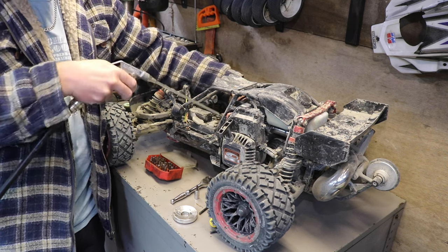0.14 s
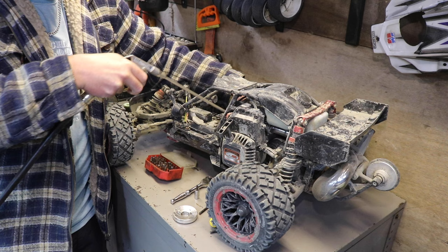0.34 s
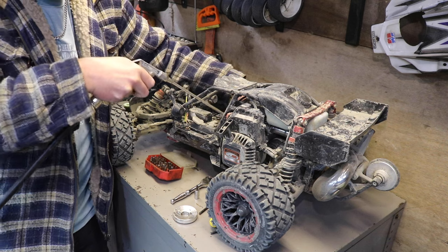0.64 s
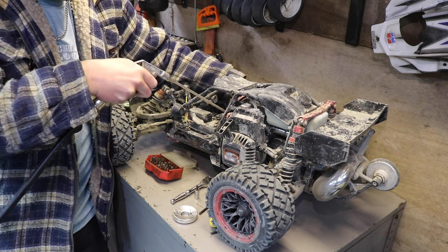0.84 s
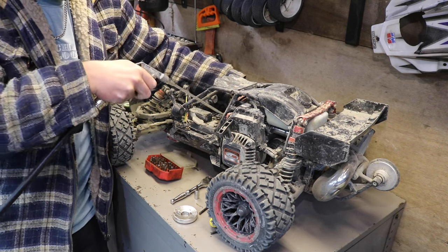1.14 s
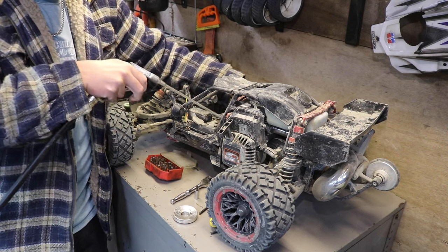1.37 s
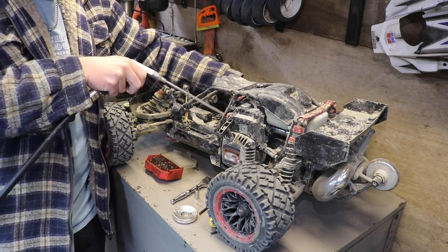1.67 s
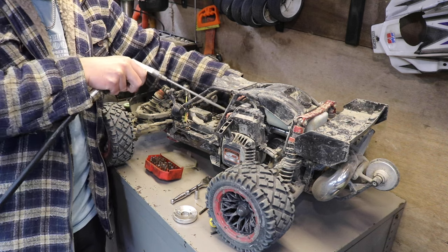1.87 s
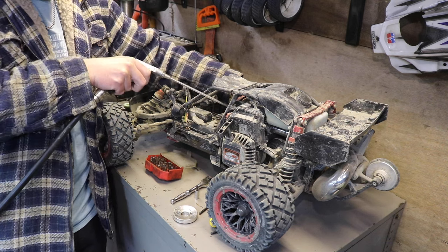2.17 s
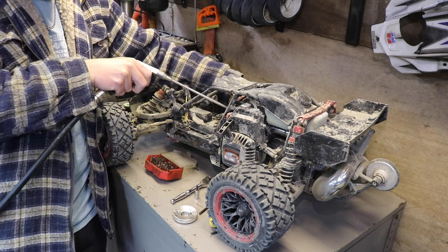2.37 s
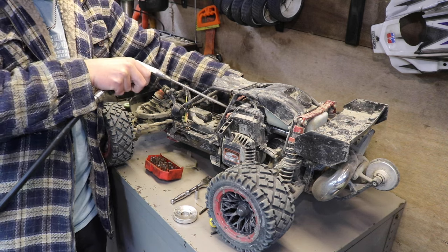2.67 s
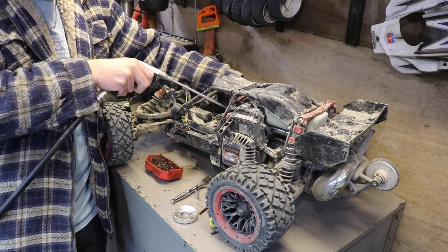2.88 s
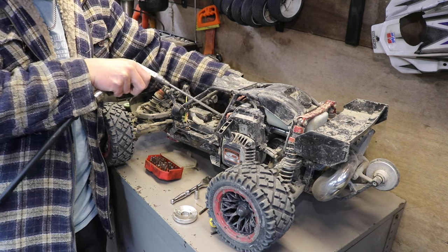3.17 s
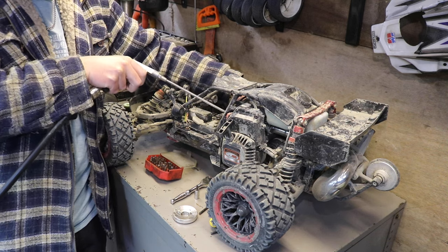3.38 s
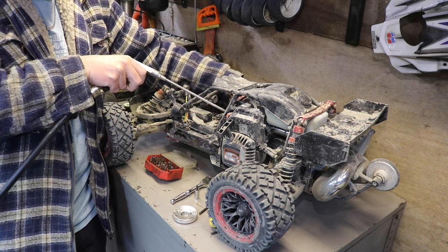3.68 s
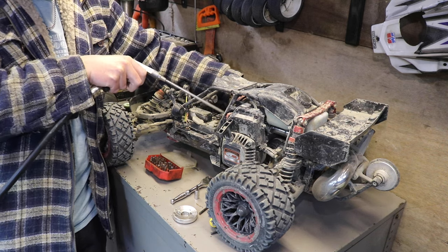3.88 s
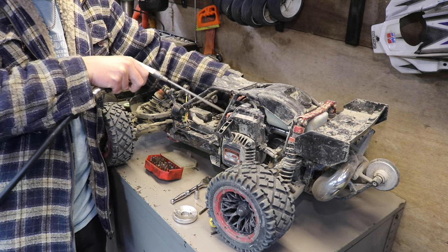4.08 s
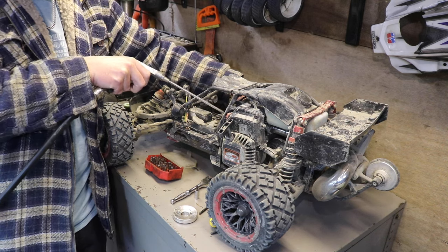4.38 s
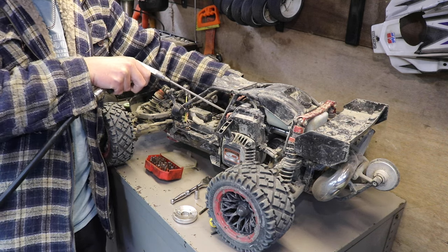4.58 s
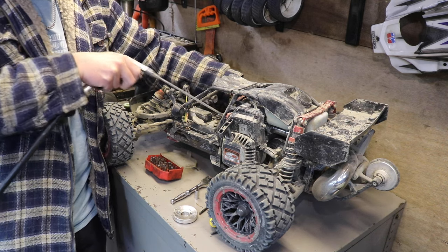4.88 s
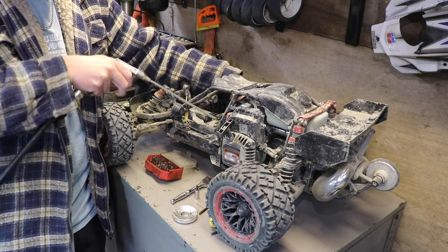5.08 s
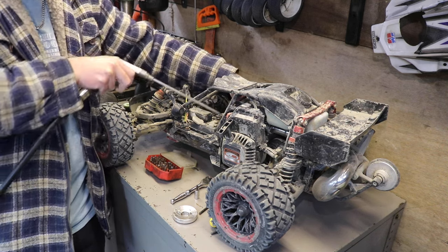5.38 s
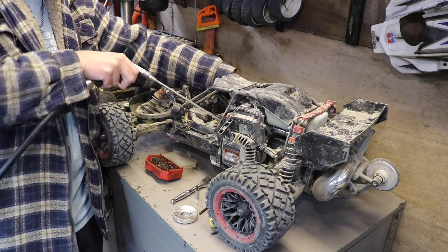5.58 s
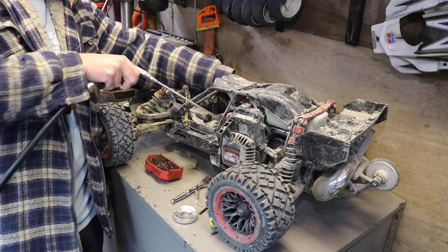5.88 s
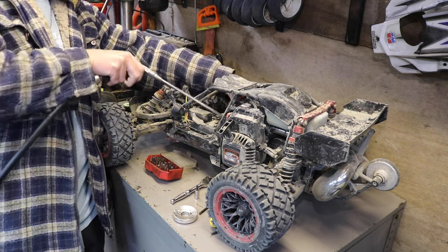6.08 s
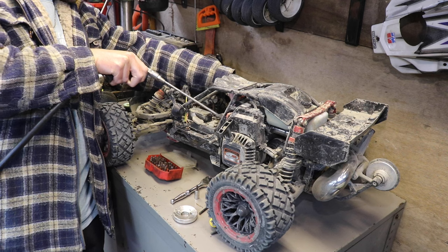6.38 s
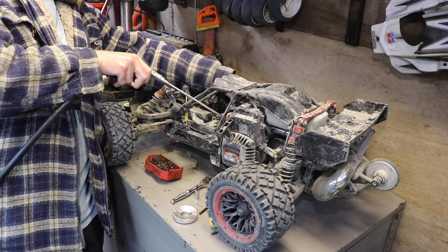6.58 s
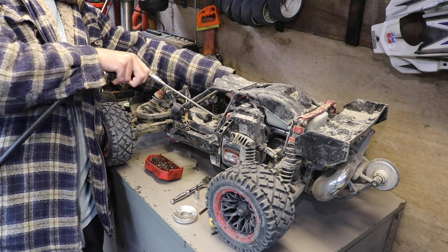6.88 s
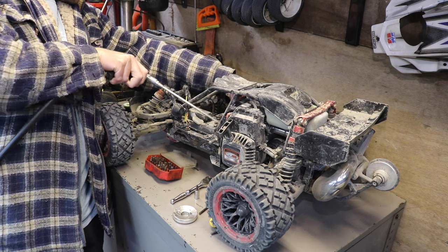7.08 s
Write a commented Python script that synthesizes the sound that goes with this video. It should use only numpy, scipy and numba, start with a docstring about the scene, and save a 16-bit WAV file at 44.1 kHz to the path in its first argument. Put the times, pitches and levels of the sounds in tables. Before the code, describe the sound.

Close in a small workshop, an air gun blows dust off a model engine. The tail of one blast stops at once, then come a short blast, a long one and another of about two seconds. The bright hiss roars when it strikes parts squarely, thins as it passes them, and chirps or shrieks on hollows and edges. Two faint ticks on the bench come near the end.

```python
"""Air gun on a model engine

A compressed-air gun blows dust off a model car's engine on a workshop bench, in four blasts.
The jet is shaped noise: it hisses, roars where it strikes the parts and takes on passing colours.
Gliding sines sing in hollows, on cooling fins and on sharp edges; damped modes tick twice on the bench.
Decaying noise tails give the scatter of the parts and the walls' brief answer, over a quiet room with thin tones.
"""
import sys
import numpy as np
from scipy import signal
from scipy.fft import rfft, irfft, next_fast_len
from scipy.io import wavfile
from scipy.ndimage import uniform_filter1d, map_coordinates
from numba import njit

SR = 44100
rng = np.random.default_rng(int(sys.argv[2]) if len(sys.argv) > 2 else 0)


def generate_wav(signal):
    """Clip the signal to [-1, 1] and save it as 16-bit WAV at the path in sys.argv[1]."""
    frames = np.transpose(np.atleast_2d(signal))
    scaled = np.clip(frames, -1, 1) * 32767
    pcm = np.round(scaled).astype(np.int16)
    wavfile.write(sys.argv[1], SR, pcm)


N = 319284  # length in samples


def amp(db):
    """Decibels to linear gain."""
    return 10 ** (np.asarray(db) / 20)


def unit(x):
    """Scale to an rms of one."""
    return x / np.sqrt(np.mean(np.abs(x) ** 2) + 1e-20)


def along(points, hz):
    """Read a curve of (Hz, value) points on a log frequency axis."""
    point_hz, value = np.transpose(points)
    return np.interp(np.log(hz + 1), np.log(point_hz + 1), value)


def sides(pan_db):
    """Left and right gains for a level difference; positive leans left."""
    return amp(np.array([pan_db, -pan_db]) / 2)


def wander(t, rate):
    """A smooth random curve at the times t, with rate knots a second."""
    knots = rng.standard_normal(int(t[-1] * rate) + 4)
    return map_coordinates(knots, [t * rate])


def wobble(rate, size):
    """A smooth random curve with one value for each of size samples."""
    return wander(np.arange(size) / SR, rate)


def within(t, start, end, ramp_s):
    """A gate from 0 to 1 and back, with linear ramps centred on both ends."""
    return np.clip(np.minimum(t - start, end - t) / ramp_s + 0.5, 0, 1)


def resonance(hz, centre_hz, width_hz):
    """A bell of height one around a resonance."""
    return 1 / (1 + (2 * (hz - centre_hz) / width_hz) ** 2)


def paired(a, b, alike):
    """Left and right spectra from two unrelated ones, as alike as asked."""
    turn = np.arccos(np.clip(alike, -1, 1))[:, None] / 2
    shared, apart = np.cos(turn) * a, np.sin(turn) * b
    return np.array([shared + apart, shared - apart])


def noise(gain):
    """Stereo noise whose rms density follows gain(Hz, s)."""
    # left-right likeness of the noise: pitch_hz, likeness (1 = identical)
    likeness = [(50, .75), (200, 0.94), (1500, 1), (6000, 0.9), (14000, 0.61)]
    hz, t, (a, b) = signal.stft(rng.standard_normal((2, N)), SR, nperseg=512)
    spectra = paired(a, b, along(likeness, hz)) * gain(hz, t)
    return signal.istft(spectra, SR, nperseg=512)[1][:, :N]


def valve(t):
    """Flow against the open valve in dB: the trigger opens it, then the flow dies to a seep."""
    # trigger pulls: opening_s, fully_open_s, let_go_s, dying_db_per_s, seep_db
    blasts = [(-.1, -.05, 0.11, 480, -67), (0.34, 0.441, 1.276, 480, -30), (1.446, 1.509, 5.14, 600, -69),
              (5.308, 5.382, 7.313, 501, -64)]
    opening_bend = 0.57  # exponent under 1: the valve opens fast at first
    flow_db, before_db = np.full(len(t), -99.), blasts[0][-1]
    for start, full, end, dying, seep_db in blasts:
        opened = np.clip((t - start) / (full - start), 0, 1) ** opening_bend
        rise_db = before_db * (1 - opened)
        fall_db = np.maximum(-dying * np.maximum(t - end, 0), seep_db)
        flow_db = np.where(t >= start, rise_db + fall_db, flow_db)
        before_db = seep_db
    return flow_db


def layer_levels(t):
    """Roar, rush, hiss and fizz in dB: one curve sets the hiss, and strikes bring out the lower layers."""
    # course of the hiss, with dips after the shrieks: time_s, nominal hiss_level_db
    hiss_course = [(0.0, -24), (0.02, -16.5), (0.11, -23), (0.44, -16), (0.48, -21), (0.732, -24),
                   (0.746, -27), (0.948, -27), (0.99, -20.5), (1.08, -21.5), (1.124, -24.5), (1.148, -16),
                   (1.184, -28), (1.27, -27.5), (1.51, -23), (1.58, -17.5), (1.69, -23.5), (1.73, -32.5),
                   (1.81, -29), (1.91, -24), (1.93, -33), (1.96, -36), (2.04, -29), (2.13, -25.5),
                   (2.22, -41), (2.31, -26.5), (2.36, -42), (2.44, -32), (2.82, -27.5), (2.84, -27),
                   (2.87, -32), (2.91, -36.5), (3.02, -26.5), (3.12, -26.5), (3.15, -31.5), (3.19, -25.5),
                   (3.28, -28), (3.49, -25.5), (3.56, -41), (3.59, -28.5), (3.62, -47), (3.8, -21),
                   (4.06, -30.5), (4.17, -22), (4.27, -26), (4.29, -20), (4.31, -26), (4.55, -26),
                   (4.62, -30), (4.64, -23.5), (4.8, -27), (4.83, -27), (4.92, -24.5), (4.95, -33.5),
                   (5.02, -23), (5.14, -21.5), (5.4, -19.5), (5.522, -22), (5.542, -25.5), (5.774, -23),
                   (5.85, -27), (6.014, -26), (6.086, -29.5), (6.204, -24), (6.336, -27.5), (6.378, -25),
                   (6.542, -26), (6.568, -23), (6.644, -21.5), (6.752, -29), (6.758, -26), (6.988, -24),
                   (7.008, -18), (7.168, -29), (7.24, -27)]
    # square landings darken the jet, passing the parts thins it: start_s, end_s, roar_gain_db, rush_gain_db
    strikes = [(0, .03, -3.5, -3), (0.4, 0.73, 1.5, 2), (0.964, 1.096, 5, 2.5), (1.173, 1.522, 11, 6.5),
               (2.07, 2.156, 3, 4), (2.764, 2.87, 4.5, 5.5), (2.977, 3.048, 6.5, 4.5),
               (3.148, 3.324, 8.5, 8), (3.975, 4.11, 10, 8), (4.201, 4.29, 7, 4.5),
               (4.422, 4.53, 7.5, -0.5), (4.64, 4.707, 5.5, 0.5), (4.831, 4.91, 6.5, 6.5),
               (5.326, 5.434, 9, 1), (5.848, 6.228, 8.5, 3), (4.956, 5.3, -3, -2), (5.683, 5.842, -4, -2),
               (6.232, 6.7, -2.5, -1), (4.304, 4.416, 3, -5), (4.73, 4.83, -2, -3), (4.12, 4.19, -2, -3),
               (.76, .95, 2, 0), (3.06, 3.135, -0.5, -5.5), (6.734, 6.91, 4.5, 1.5), (6.935, 7.07, 3, 2.5),
               (7.12, 7.2, 3.5, 0)]
    # a glancing jet against the hiss, one level_db each for roar, rush, hiss, fizz
    glancing_db = [-17, -8.5, 0, -2]
    # share of the hiss's swings that each layer ignores (0 to 1), in the same order
    steady = [0.51, 0.45, 0.074, .3]
    # how fully each layer follows the valve (dB per dB), in the same order
    valve_grip = [.8, .85, 1, 1.02]
    landing_s, fizz_per_roar = 0.012, -0.18  # a strike sets in quickly and dulls the top (dB per dB)
    time_s, hiss_db = np.transpose(hiss_course)
    hiss = np.interp(t, time_s, hiss_db)
    roar, rush = sum(np.outer(gains_db, within(t, start, end, landing_s))
                     for start, end, *gains_db in strikes)
    glancing = np.array(glancing_db)[:, None] + hiss - np.outer(steady, hiss - hiss_db.mean())
    struck = [roar, rush, 0 * t, fizz_per_roar * roar]
    return glancing + struck + np.outer(valve_grip, valve(t))


def jet_colour(hz, t):
    """The jet's spectrum, bent by how hard it strikes and by passing stretches of colour."""
    # shape of the plain jet: pitch_hz, relative density level_db
    plain_jet = [(24, -80), (40, -28.5), (171, -40), (303, -21), (476, -16.5), (959, -8), (1060, -8.5),
                 (2740, -5.5), (3520, -4.5), (4410, -7), (5260, -7.5), (6580, -8.5), (8670, -5),
                 (12900, -3), (15800, -5)]
    # ranges of roar, rush, hiss, fizz: low_hz, high_hz
    layers = [(250, 1500), (2400, 5000), (5000, 10000), (10000, 14000)]
    # coloured stretches of the jet, some swelling into a shriek:
    # start_s, end_s, mean centre_hz, width_hz, mean peak_db
    colours = [(0.403, 0.756, 3750, 170, 5.5), (0.416, 1.1, 5170, 400, 4), (4.125, 4.185, 2150, 450, 10),
               (3.47, 3.66, 13500, 2500, 4), (.42, 0.74, 9470, 200, 10), (0.43, 0.52, 2010, 400, 11.5),
               (1.556, 1.69, 2130, 597, 13), (2.4, 2.843, 6970, 400, 5), (3.006, 3.144, 8350, 600, 7),
               (3.165, 3.307, 3900, 1400, 4.5), (3.763, 3.97, 2210, 352, 15.5),
               (3.774, 3.975, 6300, 497, 6), (4.127, 4.5, 8200, 500, 6.5), (4.593, 4.825, 2190, 550, 10.5),
               (4.637, 4.82, 6620, 600, 11), (4.706, 4.818, 10400, 500, 10), (5.363, 6.22, 8530, 900, 5),
               (5.902, 6.25, 10500, 300, 7), (6.107, 7.247, 3550, 420, 9), (6.803, 6.87, 3620, 600, 3.5),
               (5.63, 5.68, 3600, 500, 6), (5.356, 6.107, 3650, 500, 4.5), (4.98, 5.156, 3720, 300, 8.5),
               (4.525, 4.595, 2280, 600, 11), (6.35, 6.7, 10500, 250, 3), (2.285, 2.34, 15000, 1500, 8),
               (3.575, 3.605, 15200, 1500, 8), (3.69, 3.725, 1700, 300, 8), (3.465, 3.49, 2200, 600, 6),
               (7.0, 7.13, 13500, 3000, 3), (4.05, 4.13, 14500, 2500, 4), (.8, .97, 15200, 2000, 6),
               (1.498, 1.707, 13100, 3500, 2), (3.303, 3.38, 14100, 3000, 4), (5.45, 5.53, 5400, 298, 8),
               (6.15, 6.233, 5400, 300, 11), (4.13, 4.31, 12200, 1200, 5), (6.456, 6.7, 13000, 1500, 3),
               (6.677, 7.24, 8400, 700, 5)]
    # chassis resonances, always in the roar: centre_hz, width_hz, peak_db
    chassis = [(316, 54, 8.5), (553, 46, 9), (1046, 33, 2.5), (1416, 75, 6.5), (2364, 200, 2.5)]
    base = amp(along(plain_jet, hz))
    # each layer's level is counted against the power of the plain jet in its range
    plain_db = [10 * np.log10(np.sum(base[(hz >= lo) & (hz < hi)] ** 2) / len(hz)) for lo, hi in layers]

    # crossfade between neighbouring layers on a log frequency axis
    centres_hz = np.sqrt(np.prod(layers, axis=1))
    place = np.interp(np.log(hz + 1), np.log(centres_hz), np.arange(len(layers)))
    share = np.clip(1 - np.abs(place[:, None] - np.arange(len(layers))), 0, 1)
    db = share @ (layer_levels(t) - np.array(plain_db)[:, None])

    for start, end, centre_hz, width_hz, peak_db in colours:
        drift = 1 + 0.0063 * wander(t, 30)  # the colour trembles in pitch
        strength_db = (peak_db + 2.0 * wander(t, 40)) * within(t, start, end, 0.022)
        db += strength_db * resonance(hz[:, None], centre_hz * drift, width_hz)
    for centre_hz, width_hz, peak_db in chassis:
        db += peak_db * resonance(hz[:, None], centre_hz, width_hz)

    # turbulence and a shaking hand: 2 dB rms patches of gain in pitch and time
    patches = uniform_filter1d(rng.standard_normal(db.shape), size=5, axis=0)
    patches = uniform_filter1d(patches, size=10, axis=1)
    return base[:, None] * amp(db + 2.0 * unit(patches)) * sides(-0.8)[:, None, None]


def jet():
    """Turbulent noise that flutters as eddies tear off."""
    flutter_db = 0.5 + 1.0 * wobble(30, N) + 0.63 * wobble(300, N)
    return noise(jet_colour) * amp(flutter_db)


def echoes(x, decay):
    """A noise tail in which each frequency dies at its own speed, driven by the mono sum."""
    # long waves reach both sides alike: pitch_hz, left-right likeness (1 = identical)
    tail_likeness = [(200, 1), (800, 0.68), (2000, 0.15), (6000, 0.11)]
    hz, t, (a, b) = signal.stft(rng.standard_normal((2, SR // 2)), SR, nperseg=256)
    fade = amp(-60 * t / along(decay, hz)[:, None])
    tail = signal.istft(paired(a, b, along(tail_likeness, hz)) * fade, SR, nperseg=256)[1]
    tail = tail / np.linalg.norm(tail[0])
    late = np.pad(x.mean(axis=0), (100, 0))  # delay in samples
    return signal.oaconvolve(late[None], tail, axes=1)[:, :N]


def shop(air, tones):
    """The direct sounds, their scatter close by and the answer of the walls."""
    # scatter among the parts and off the bench: pitch_hz, t60_s
    parts_decay = [(300, 0.062), (4000, 0.04), (15000, 0.059)]
    # the workshop walls: pitch_hz, t60_s
    wall_decay = [(200, 0.56), (2000, 0.3), (8000, 0.31), (15000, 0.16)]
    near = echoes(amp(-7.5) * air + amp(-9) * tones, parts_decay)
    walls = echoes(amp(-18.5) * air + amp(-8.5) * tones, wall_decay)
    return air + tones + near + walls


def idle():
    """The quiet room: shaped noise with a few thin tones, unsteady in level and phase."""
    # shape of the idle shop's noise: pitch_hz, relative density level_db
    room_shape = [(18, -30), (30, -1), (459, -12.5), (860, -18.5), (955, -25.5), (1340, -6), (1490, -15),
                  (2730, -12.5), (15800, -38)]
    # faint lasting tones: pitch_hz, mean peak level_db
    thin_tones = [(1342, -84), (2490, -84), (2752, -78)]
    t = np.arange(N) / SR
    tones = sum(amp(db + 3 * wobble(23, N)) * np.sin(2 * np.pi * hz * t + 0.8 * wobble(25, N))
                for hz, db in thin_tones)
    room = noise(lambda hz, t: amp(along(room_shape, hz))[:, None])
    return amp(-72.5) * unit(room) + tones


def whistles(notes, rise_db_per_s, fade_db_per_s, waver, flutter_db, flutter_rate, octave_db):
    """Flow tones swell, hold and fade while they glide; unsteady in pitch and strength, with a weak octave."""
    silent_db = 35  # each note starts and stops this far below its held level
    out = np.zeros((2, N))
    for s, hold, hz, glide, db, pan_db in notes:
        first = round((s - silent_db / rise_db_per_s) * SR)
        last = round((s + hold + silent_db / fade_db_per_s) * SR)
        at = np.arange(first, last)
        t = at / SR - s
        pitch_hz = hz * 2 ** (glide * t) * (1 + waver * wobble(flutter_rate, SR // 4)[:len(t)])
        turns = np.cumsum(pitch_hz) / SR
        shape_db = rise_db_per_s * np.minimum(t, 0) - fade_db_per_s * np.maximum(t - hold, 0)
        unsteady_db = flutter_db * wobble(flutter_rate, SR // 4)[:len(t)]
        level = np.sqrt(2) * amp(db + shape_db + unsteady_db)  # dB as rms of the sine
        tone = np.sin(2 * np.pi * turns) + amp(octave_db) * np.sin(4 * np.pi * turns)
        out[:, at] += level * tone * sides(pan_db)[:, None]
    return out


def hollows():
    """The jet blows across hollows, which sing like bottle mouths."""
    # notes: held_from_s, hold_s, pitch_hz, glide_octaves_per_s, relative level_db, left_minus_right_db
    hollow_notes = [(1.694, 0.038, 2000, -0.8, -14, 3), (1.746, .01, 1850, 0, -21.5, -2),
                    (1.77, 0.013, 1925, 0, -29, 0), (1.919, 0.024, 1910, 2.5, -13, 5),
                    (1.974, 0.0063, 1962, 0, -14.5, 7), (1.992, 0.0049, 1952, 0.5, -20, 0),
                    (2.016, 0.003, 1944, -0.5, -19.5, -1), (3.36, .004, 1860, 0.5, -14, 1),
                    (3.381, .003, 1904, 3.3, -23.5, -4), (3.488, .003, 1826, 1, -19.5, -2),
                    (3.507, 0.005, 1880, -.2, -16, -2), (3.527, .003, 1870, -1, -31, -3),
                    (3.725, .031, 1870, 5, -12, 6.5), (3.772, 0.024, 2070, -.5, -22, 3),
                    (4.584, .005, 2116, 0.7, -12.5, 0.5), (4.604, 0.029, 2157, 1, -20.5, 7)]
    return amp(1.5) * whistles(hollow_notes, 2800, 2000, waver=0.0084, flutter_db=1.5,
                               flutter_rate=75, octave_db=-28)


def fins():
    """The jet grazes cooling fins and sets off rough, high flow tones."""
    # notes: held_from_s, hold_s, pitch_hz, glide_octaves_per_s, relative level_db, left_minus_right_db
    fin_notes = [(1.753, 0.0076, 11530, -9.5, -21.5, 3), (3.08, 0.021, 10820, -1, -18.5, -2),
                 (3.382, .002, 11450, -5, -17, .5), (3.485, .012, 10900, 8.5, -20, 2),
                 (3.692, 0.018, 11400, 2, -31, 7)]
    return amp(1.0) * whistles(fin_notes, 2000, 1800, waver=0.018, flutter_db=3.5,
                               flutter_rate=405, octave_db=-90)


def edges():
    """The nozzle nearly touches sharp edges, and the flow shrieks."""
    # notes: held_from_s, hold_s, pitch_hz, glide_octaves_per_s, relative level_db, left_minus_right_db
    edge_notes = [(2.142, .005, 13400, 19.5, -24, 0), (2.15, .006, 15100, 3.5, -12, -2),
                  (2.202, 0.01, 15600, 0.5, -14, 4), (2.306, .016, 14700, -4, -18.5, -2),
                  (2.324, .01, 15000, 4, -13, -2), (2.846, .003, 12800, 45.5, -21.5, -1),
                  (2.851, 0.0073, 14700, 9, -11, -1), (2.866, .006, 15700, .3, -14, -2),
                  (2.884, .011, 15500, -5, -11.5, -4), (3.529, .003, 15750, 3, -11.5, 1),
                  (3.532, .005, 15050, 1, -13.5, -1), (3.591, .004, 15100, 0, -19, -3),
                  (3.597, .005, 15730, 0.8, -9, 0)]
    return amp(4) * whistles(edge_notes, 3000, 2600, waver=0.009, flutter_db=3.0,
                             flutter_rate=500, octave_db=-87)


def knock():
    """Two dull ticks on the bench top as sums of damped modes, the first with more thud."""
    # ticks: start_s, relative level_db, thud_db added to the modes below 400 Hz
    ticks = [(6.784, -17.5, -3.5), (7.015, -22.5, -22)]
    # modes of the bench top: pitch_hz, relative level_db, t60_s
    bench_modes = [(140, -11, 0.026), (317, -3, 0.04), (584, 4, 0.013), (950, 5, .014), (1400, 4, 0.011),
                   (2000, -5, .008)]
    out, t = np.zeros(N), np.arange(SR // 10) / SR
    onset = 1 - np.exp(-t / 0.00013)
    for s, db, thud_db in ticks:
        ring = sum(amp(level_db + thud_db * (hz < 400) - 60 * t / t60) * np.cos(2 * np.pi * hz * t)
                   for hz, level_db, t60 in bench_modes)
        out[round(s * SR):][:len(t)] += amp(db - 3.5) * ring * onset
    return out


def scene():
    """The jet, its flow tones and the ticks sound in the workshop, over the idle room."""
    tones = hollows() + fins() + edges()
    return shop(jet(), tones + knock()) + idle()


@njit
def follow(level, attack, release):
    """An envelope that rises fast and sinks slowly."""
    out, held = np.empty_like(level), level[0]
    for i in range(len(level)):
        held += (attack if level[i] > held else release) * (level[i] - held)
        out[i] = held
    return out


def record(dry):
    """Gain control pulls both sides down after a loud moment; filters thin the bass and cut the extreme top."""
    attack_s, release_s = 0.006, 0.07
    bass_hz, top_hz = 70, 15770
    loud = follow(np.abs(dry).max(axis=0), 1 / (attack_s * SR), 1 / (release_s * SR))
    held = dry / (1 + (loud / amp(-12)) ** 4) ** 0.18
    m = next_fast_len(N + SR // 4)  # padding keeps the filters from wrapping round
    hz = np.fft.rfftfreq(m, 1 / SR)
    bass_cut = 1j * hz / (bass_hz + 1j * hz)
    top_cut = np.sin(np.pi / 2 * np.clip((top_hz - hz) / 150 + 0.5, 0, 1)) ** 2
    return irfft(rfft(held, m) * bass_cut * top_cut, m)[:, :N]


dry = scene()
out = record(dry)
generate_wav(out)
```